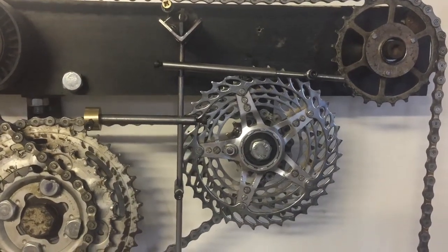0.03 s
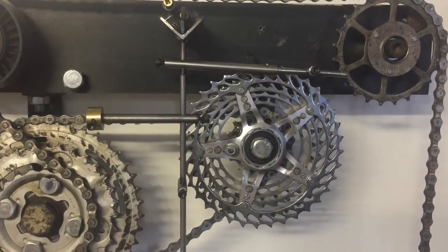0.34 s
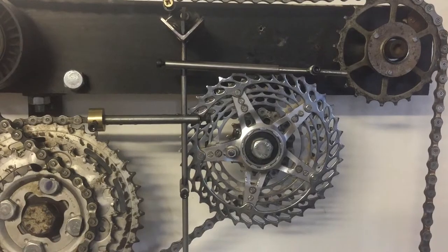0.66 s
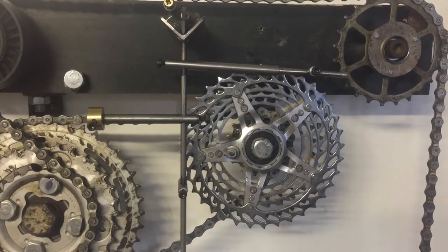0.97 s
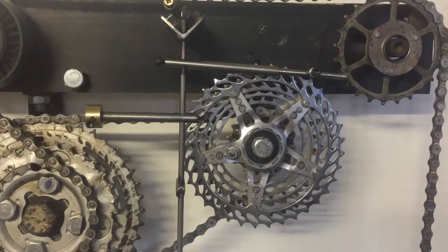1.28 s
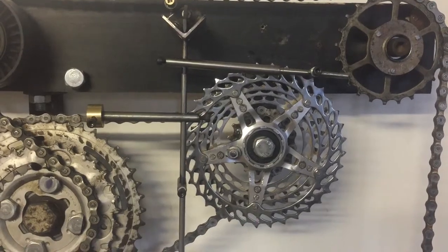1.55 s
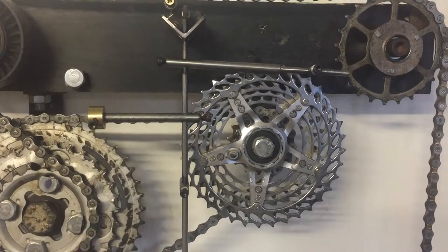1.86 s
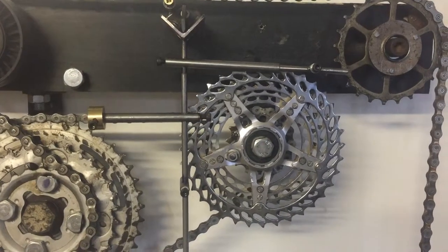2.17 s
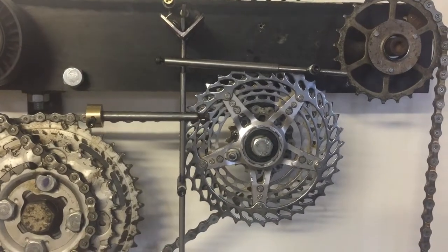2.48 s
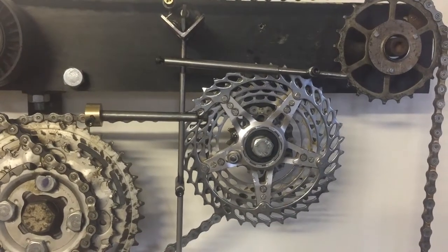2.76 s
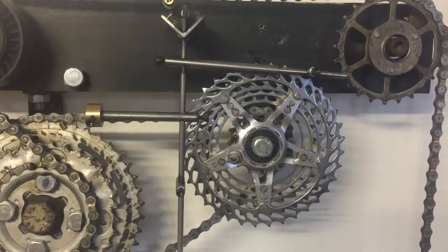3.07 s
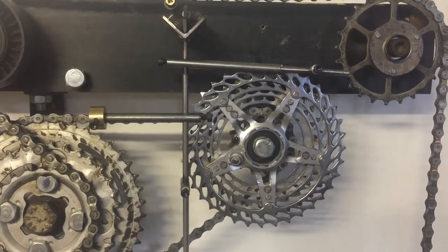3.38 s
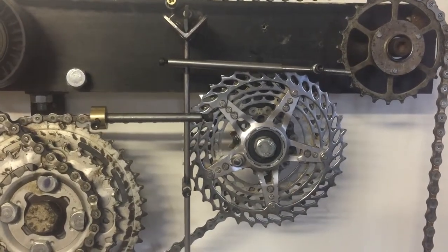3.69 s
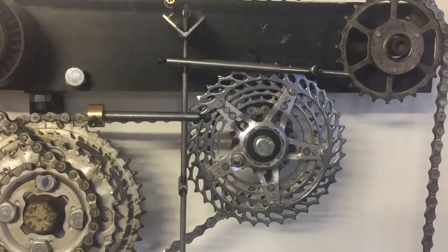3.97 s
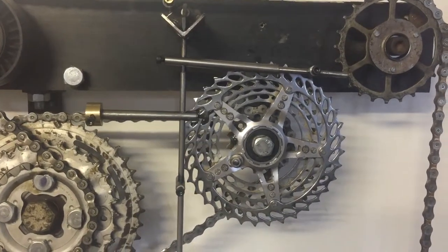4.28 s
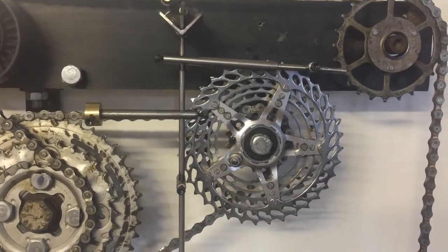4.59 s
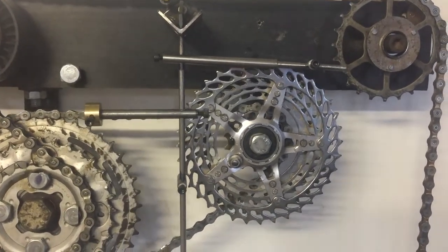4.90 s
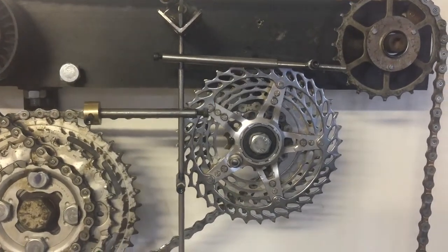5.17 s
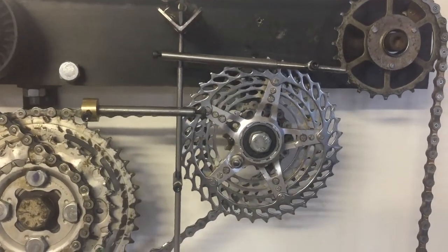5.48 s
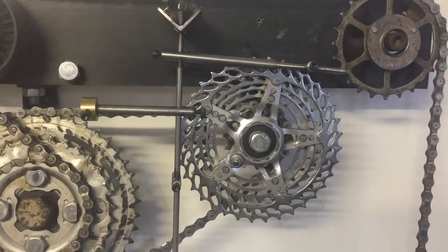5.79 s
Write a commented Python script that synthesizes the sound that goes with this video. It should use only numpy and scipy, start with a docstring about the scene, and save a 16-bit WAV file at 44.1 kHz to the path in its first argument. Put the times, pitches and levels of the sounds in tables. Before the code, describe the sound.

A large mechanical wall clock of sprockets and chain beats slowly, close to the microphone in a quiet room. Firm, sharp ticks with a knocking body land at about 0.6, 2.1, 3.6 and 4.9 seconds. Lighter, brighter tocks answer at about 1.2, 2.8, 4.1 and 5.6 seconds, each bouncing in a quick, tiny rattle and leaving the metal wheel ringing for around half a second. Before each beat the teeth scrape softly, and the chain settles with a faint click roughly once a second. Deeper in the room, a dry bearing gives brief, thin, high squeaks and rasps, right at the start and around 1.1, 1.8, 3.8 and 4.8 seconds. A soft, wavering low hum with dull rumble and faint hiss lies underneath throughout, and the room adds a short reverberant tail to every beat.

```python
"""Bicycle-part wall clock, close up

A quiet room, one microphone close to a large, slow clock. The escape wheel drops on two pallets in
turn: a firm tick, then a lighter tock that bounces and leaves the wheel ringing. Between the beats
the teeth rub along the pallets and the chain settles. A dry bearing squeaks deeper in the room,
and a low hum lies under it all."""
import sys
import numpy as np
from scipy import signal
from scipy.fft import rfft, irfft
from scipy.io import wavfile

SR = 44100
rng = np.random.default_rng(int(sys.argv[2]) if len(sys.argv) > 2 else 0)


def master(y):
    """Save y as 16-bit WAV."""
    cut = np.clip(np.atleast_2d(y).T, -1, 1)
    pcm = np.round(cut * 32767)  # scale
    wavfile.write(sys.argv[1], SR, pcm.astype(np.int16))


N = 257544
TIME = np.arange(N) / SR
SIZE = 32768   # samples in an impulse response
HZ = np.maximum(np.arange(SIZE // 2 + 1) * SR / SIZE, 1)


def from_db(db):
    """Decibels to gain."""
    return 10 ** (np.asarray(db) / 20)


def unit_rms(x):
    """Scale to unit power."""
    return x / np.sqrt(np.mean(x ** 2) + 1e-20)


def at_hz(rows, hz, column=1):
    """Read one column of a table along log frequency."""
    rows = np.array(rows)
    return np.interp(np.log(hz), np.log(rows[:, 0]), rows[:, column])


def in_time(rows):
    """Join (t/s, value) rows by straight lines."""
    return np.interp(TIME, *np.transpose(rows))


def hump(centre_hz, octaves):
    """A smooth hump of height 1 along log frequency."""
    return np.exp(-.5 * (np.log2(HZ / centre_hz) / octaves) ** 2)


def causal(db):
    """Minimum-phase impulse response with the given gain at every frequency."""
    cepstrum = irfft(np.log(from_db(db)))
    cepstrum[1:SIZE // 2] *= 2
    cepstrum[SIZE // 2 + 1:] = 0
    return irfft(np.exp(rfft(cepstrum)))


def through(x, response):
    """Pass a sound through an impulse response."""
    return signal.fftconvolve(x, response)[:len(x)]


def band(x, low_hz, high_hz):
    """Butterworth band-pass."""
    return signal.sosfilt(signal.butter(2, [low_hz, high_hz], "band", fs=SR, output="sos"), x)


def drift(rate_hz):
    """A random wander of unit power."""
    return unit_rms(np.interp(TIME * rate_hz, np.arange(N // 4), rng.standard_normal(N // 4)))


def add(out, s, sound):
    """Mix a sound in at s seconds."""
    start = max(round(s * SR), 0)
    out[start:start + len(sound)] += sound[:max(N - start, 0)]


# Hum and rumble at the microphone: t/s, level/dB
HUM_LEVEL = [(0.0, -51), (0.03, -54), (0.45, -56.5), (0.75, -51), (0.96, -57), (1.41, -51.5), (1.66, -62),
             (1.74, -54), (1.97, -72), (2.03, -57), (2.08, -76), (2.2, -54.5), (3.32, -51), (4.02, -55),
             (5.56, -52.5), (5.71, -57), (5.84, -58)]
RUMBLE_LEVEL = [(0, -59.5), (1.9, -60.5), (3.0, -56.5), (5.0, -62), (5.84, -59)]
# Colour of the rumble and of the hiss: f/Hz, relative level/dB
RUMBLE_SPECTRUM = [(20, -24.5), (40, -13.5), (62, 0), (90, -2), (130, -12.5), (200, -18), (300, -26),
                   (600, -30.5), (1500, -77)]
HISS_SPECTRUM = [(150, -11), (250, -5), (510, -28), (629, -14), (860, -19), (1060, -15.5), (1260, -17),
                 (1670, -22.5), (2130, -22.5), (3910, -24.5), (16000, -34)]

def room_tone(hum_hz=43.3, waver_hz=1.2, hiss_db=-68.5):
    """The bed of the room: a wavering hum, dull rumble and faint hiss."""
    phase = 2 * np.pi * np.cumsum(hum_hz + waver_hz * drift(14)) / SR
    hum = np.sqrt(2) * from_db(in_time(HUM_LEVEL)) * np.sin(phase)
    rumble, hiss = (unit_rms(through(rng.standard_normal(N), causal(at_hz(spectrum, HZ))))
                    for spectrum in (RUMBLE_SPECTRUM, HISS_SPECTRUM))
    return hum + from_db(in_time(RUMBLE_LEVEL)) * rumble + from_db(hiss_db) * hiss


# Diffuse tail of the room and the clock's many parts: f/Hz, base t60/s, relative level/dB
ROOM_TAIL = [(151, 0.48, 4.5), (402, 0.44, 2), (1120, 0.35, -3), (2520, 0.46, 0), (4470, 0.32, -4),
             (9250, 0.23, -1), (16000, 0.29, -7.5)]

def in_room(x, wet_db, linger, build_s=.0054):
    """Sound reaches the microphone directly and as a diffuse tail; linger scales the decay times."""
    t, tail = TIME[:SIZE], 0
    swell = 1 - np.exp(-(t / build_s) ** 2)
    edges = np.geomspace(100, 18000, 24)   # third octaves
    for low, high in zip(edges, edges[1:]):
        hz, inside = np.sqrt(low * high), (HZ >= low) & (HZ < high)
        noise = irfft(rfft(rng.standard_normal(SIZE)) * inside)
        decay = from_db(-60 * t / (linger * at_hz(ROOM_TAIL, hz)))
        gain = np.sqrt(inside.mean() / SIZE) * from_db(at_hz(ROOM_TAIL, hz, column=2))
        tail = tail + gain * unit_rms(noise * decay * swell)
    wet = from_db(wet_db)
    return (x + wet * through(x, tail)) / np.sqrt(1 + wet ** 2)


def squeaks(rows, pitch_hz, jitter_hz, level_db, apart_s, strands, flutter_db=3, edge_s=.0017):
    """Thin, unsteady tones in staggered strands, arcing through a first, middle and last pitch."""
    out, arc = np.zeros(N), np.polyfit([0, .5, 1], pitch_hz, 2)
    for strand in range(strands):
        jitter, flutter = drift(600), from_db(level_db + flutter_db * drift(90))
        for s, length, db in rows:
            since = TIME - s - strand * apart_s
            on = (since >= 0) & (since < length)
            t = since[on]
            hz = np.polyval(arc, t / length) + jitter_hz * jitter[on]
            swell = np.clip(np.minimum(t, length - t) / edge_s, 0, 1)
            tone = np.sqrt(2) * np.sin(2 * np.pi * np.cumsum(hz) / SR)
            out[on] += from_db(db) * swell * flutter[on] * tone
    return out


# Rasps that slide down, and rasps that rise and fall: t/s, relative level/dB
FALLING_RASPS = [(-.025, -64), (1.027, -65), (4.796, -68), (5.80, -68.5)]
ARCHING_RASPS = [(0.076, -62.5), (1.838, -62), (3.852, -59)]
# Held whistles: t/s, length/s, relative level/dB
HELD_WHISTLES = [(.04, 0.066, -60.5), (1.09, .06, -59), (1.16, 0.12, -63), (2.26, 0.019, -62.5),
                 (3.685, 0.108, -61.5), (4.86, 0.044, -58.5)]

def dry_bearing(fall_s=.079, arch_s=.108):
    """A dry bearing rasps, or whistles when the squeak locks on to its resonance."""
    falls = [(s, fall_s, db) for s, db in FALLING_RASPS]
    arches = [(s, arch_s, db) for s, db in ARCHING_RASPS]
    return (squeaks(falls, (4370, 3730, 3496), jitter_hz=199, level_db=-3, apart_s=.007, strands=3)
            + squeaks(arches, (3600, 4730, 3260), jitter_hz=221, level_db=-7, apart_s=.008, strands=4)
            + squeaks(HELD_WHISTLES, (3410, 3430, 3460), jitter_hz=31.8, level_db=-.5,
                      apart_s=.0078, strands=2))


# Broad colour of a blow: f/Hz, gain at the entry pallet/dB, gain at the exit pallet/dB
BLOW_SPECTRUM = [(41, -15, -41), (103, 5.5, 7.5), (145, -5.5, -13), (291, -2.4, 9.5), (610, 11, 8.5),
                 (1030, 9.5, 11), (1940, -7, -13), (3480, -5, -9), (4680, -8, -13), (8350, -13.5, -20),
                 (11800, -13, -20.5), (16100, -15, -18.5)]
# Resonances of frame and wheel: f/Hz, width/Hz, peak struck at entry/dB, peak struck at exit/dB
FRAME_MODES = [(172, 8, 18.0, 11.5), (209, 8, 11.3, 12.2), (289, 20, 14.5, 5), (333, 21, 7.4, 7.5),
               (455, 12, 6.2, 4.5), (534, 24, 12, 4), (599, 19, 4.1, 5.6), (710, 57, -3.7, -12.7),
               (839, 30, 6.2, 10.6), (984, 23, 15, 13), (1063, 45, 6, 11), (1254, 60, 12.1, 3.0),
               (1372, 24, 3.3, 5.5), (1560, 60, 12.5, 13.4), (1772, 33, 6.3, 5.5), (1911, 59, 12.4, 13.8),
               (2032, 109, 11.5, 14.5), (2276, 79, 14.8, 11.2), (2593, 133, 6.4, 11.7),
               (2832, 145, 4.8, 9.9), (3906, 189, 5.7, 8.7), (4559, 223, 7.9, 12.0), (5866, 156, 6.6, 6.5),
               (7117, 341, 6.5, 6.2), (8811, 220, 10.0, 11.8), (9611, 153, 6.9, 8.4),
               (10309, 105, 3.3, 6.6), (10967, 103, 5.5, 6.9), (15484, 167, 8.3, 8.7)]

def frame_db(pallet):
    """Gain of the clock frame when driven at one pallet (1 entry, 2 exit)."""
    db = at_hz(BLOW_SPECTRUM, HZ, column=pallet)
    for hz, width_hz, *peaks_db in FRAME_MODES:
        detune = ((hz ** 2 - HZ ** 2) / (width_hz * HZ)) ** 2
        db = db + 10 * np.log10((detune + from_db(peaks_db[pallet - 1]) ** 2) / (detune + 1))
    return db


def tooth_db(vary_db=2, points=60):
    """Every tooth meets the pallet at a slightly different spot and colours the blow."""
    log_hz = np.linspace(np.log(200), np.log(16000), points)
    return vary_db * np.interp(np.log(HZ), log_hz, rng.standard_normal(points))


def scatter(spread_s, echo=.62, count=7):
    """A blow reflects back and forth in rods and spokes: a chain of short all-pass echoes."""
    paths = np.geomspace(1, 10, count) * rng.uniform(.8, 1.2, count)
    lags = np.round(paths / paths.sum() * spread_s * SR)
    delay = np.exp(-2j * np.pi * np.outer(lags, HZ) / SR)
    return irfft(np.prod((delay - echo) / (1 - echo * delay), axis=0))


def tooth_strokes(beats, catch, slide, slide_lead_s):
    """Before each beat the tooth catches, then slides off; both are (half length/s, groan/dB)."""
    out = []
    for s, *_, catch_lead_s, catch_db, slide_db in (row[:8] for row in beats):
        out += [(s - catch_lead_s, catch_db, *catch), (s - slide_lead_s, slide_db, *slide)]
    return out


# Chain links rub on the sprockets: t/s, level/dB
LINK_RUBS = [(.008, -57), (.10, -60.5), (.934, -66.5), (1.445, -63), (2.506, -65), (4.441, -61),
             (4.63, -63.5), (5.495, -61)]

def rubbing(colour_db, grain_db=4, resonant=.99, lean=.18, link_half_s=.017, link_groan_db=-4):
    """Sliding teeth and links feed grainy friction into the frame; each stroke bites, then eases off."""
    out, t = np.zeros(N), TIME[:SIZE // 2]
    strokes = (tooth_strokes(ENTRY_BEATS, catch=(.014, -4), slide=(.015, -4), slide_lead_s=.045)
               + tooth_strokes(EXIT_BEATS, catch=(.016, 1.8), slide=(.029, -2), slide_lead_s=.083)
               + [(s, db, link_half_s, link_groan_db) for s, db in LINK_RUBS])
    for s, db, half_s, groan_db in strokes:
        start = max(s - 3 * half_s, 0)
        along = (start + t - s) / half_s
        swell = np.exp(-.5 * np.minimum(np.abs(along) / (1 + lean * np.sign(along)), 10) ** 2)
        noise = rng.standard_normal(len(t))
        grains = from_db(grain_db * np.repeat(rng.standard_normal(len(t) // 128), 128))
        frame = causal(resonant * colour_db + tooth_db(vary_db=5, points=140))
        friction = through(noise * grains * swell, frame)
        groan = from_db(groan_db) * unit_rms(band(friction, 199, 417))
        scrape = unit_rms(band(friction, 770, 2820))
        add(out, start, from_db(db) * (groan + scrape) * np.sqrt(np.mean(swell ** 2)))
    return out


# Long ringing of the escape wheel: f/Hz, base level/dB, t60/s
WHEEL_MODES = [(210, -52, .7), (840, -52, .5), (985, -56, .45), (1085, -56, .6), (1270, -59, .6),
               (1604, -58, .7), (1780, -62, .55), (1915, -58, .55), (2030, -61, .45), (2202, -65, .5),
               (2326, -62, .5), (2541, -67, .45), (3025, -63, .55), (3251, -67, .55), (3451, -63, .65),
               (3875, -63, .5), (4301, -67, .55), (5690, -66, .35), (7305, -74, .5), (7940, -69, .55),
               (8489, -69, .45), (8812, -64, .3), (9017, -65, .3), (9437, -67, .3), (10088, -68, .45),
               (10346, -64, .3), (10739, -69, .4)]

def wheel_ring(vary_db=7, damping_db=7.5):
    """Each contact wakes the wheel's modes with its own strengths; the pallet damps the highest."""
    hz, db, t60 = np.transpose(WHEEL_MODES)[:, :, None]
    t = TIME[:SIZE // 2]
    struck_db = db + vary_db * rng.random(db.shape) - damping_db * (hz / hz.max()) ** 2
    phase = 2 * np.pi * (hz * t + rng.random(db.shape))
    ring = np.sum(from_db(struck_db - 60 * t / t60) * np.sin(phase), axis=0)
    fade = 1 - (t / t[-1]) ** 8
    return np.pad(ring * fade, (0, SIZE // 2))


# The wheel rebounds in the same rhythm after every tock: delay/s, relative level/dB, brightest f/Hz
WHEEL_REBOUNDS = [(0.035, -6.5, 5600), (0.058, -8.5, 9800), (.088, -6.5, 9700), (.143, -15, 9500),
                  (0.204, -20, 9530)]
# The chain settles link by link: t/s, relative level/dB, brightest f/Hz
LINK_CLICKS = [(0.451, -29, 4800), (1.444, -31, 4500), (2.4511, -26, 5660), (3.478, -24.5, 5950),
               (4.4140, -23, 9200), (4.4514, -22.5, 6200), (5.478, -25, 3040)]

def rebounds_and_clicks(colour_db, thin_hz=4500, bright_db=9, level_db=-2):
    """Wheel rebounds and chain clicks carry little bass, and each has its own bright region."""
    rebounds = [(s + delay, db - loss * delay, hz)
                for s, *_, loss in EXIT_BEATS for delay, db, hz in WHEEL_REBOUNDS]
    out = np.zeros(N)
    for s, db, hz in rebounds + LINK_CLICKS:
        click_db = colour_db + level_db + bright_db * hump(hz, octaves=.18)
        click = causal(click_db + tooth_db(vary_db=5, points=140))
        add(out, s, from_db(db) * through(click + wheel_ring(), scatter(spread_s=.004)))
    return signal.sosfilt(signal.butter(1, thin_hz, "high", fs=SR, output="sos"), out)


def after_knock(beats, colour_db, delay_s, level_db, band_hz, spread_s=.006):
    """A duller thump or knock follows a set time after each beat."""
    out = np.zeros(N)
    for s, db, *_ in beats:
        knock = causal(colour_db + db + level_db + tooth_db())
        add(out, s + delay_s, through(knock, scatter(spread_s)))
    return band(out, *band_hz)


# Ticks, a tooth landing on the entry pallet (levels are relative):
# t/s, level/dB, knock/dB, treble/dB, wheel ring/dB, lead of the catch/s, catch/dB, last slide/dB
ENTRY_BEATS = [(.6428, 0.5, -1.5, -1, -11, 0.21, -78, -44.5), (2.1362, 0, 1.5, 2, -6, 0.21, -61, -47.5),
               (3.5797, -0.7, 0.5, -0.5, -10, .125, -63.5, -54.5),
               (4.9274, -1, -2, 2.5, -10.5, 0.19, -58, -55)]
# Tocks, on the exit pallet: the same columns, then decay of the rebounds/(dB per s)
EXIT_BEATS = [(1.2295, -3, -4.5, 1.7, 1.5, .202, -55, -63, 55),
              (2.7615, -4, -8, 5.6, 2.5, .176, -58.5, -56.5, 180),
              (4.1396, -3, -3.5, 3.5, 5, .24, -60, -57, 60),
              (5.6018, -5, -3, 7.8, -1, 0.23, -59.5, -64, 152)]

def escapement(beats, colour_db, thud_db, spread_s, crack_db, crack_hz, wet_db, linger):
    """A tooth drops on a pallet: a crack, then the blow spreads through the frame and rings the wheel."""
    blows, ringing = np.zeros((2, N))
    thud, knock = hump(250, octaves=.46), hump(930, octaves=.22)
    treble = HZ ** 2 / (HZ ** 2 + 2500 ** 2)
    crack_share = np.clip(from_db(crack_db) * hump(crack_hz, octaves=1.14), .01, .95)
    for s, db, knock_db, treble_db, ring_db, *_ in beats:
        gain_db = colour_db + db + thud_db * thud + knock_db * knock + treble_db * treble + tooth_db()
        crack = through(causal(gain_db + 20 * np.log10(crack_share)), scatter(spread_s=.0025))
        body = through(causal(gain_db + 10 * np.log10(1 - crack_share ** 2)), scatter(spread_s))
        add(blows, s, crack + body)
        add(ringing, s, from_db(db + ring_db) * wheel_ring())
    return in_room(blows, wet_db, linger) + ringing


def scene():
    """Mono, close to the clock with the room around it; the squeaks lie deeper in the room."""
    entry_db, exit_db = frame_db(pallet=1), frame_db(pallet=2)
    ticks = escapement(ENTRY_BEATS, entry_db, thud_db=1, spread_s=.0068,
                       crack_db=-4, crack_hz=3030, wet_db=-3.5, linger=.67)
    tocks = escapement(EXIT_BEATS, exit_db, thud_db=-1, spread_s=.009,
                       crack_db=.5, crack_hz=4070, wet_db=-1.5, linger=.94)
    thumps = after_knock(ENTRY_BEATS, entry_db, delay_s=.026, level_db=0, band_hz=(241, 418))
    thumps += after_knock(EXIT_BEATS, exit_db, delay_s=.005, level_db=-1, band_hz=(275, 425),
                          spread_s=.0031)
    knocks = after_knock(EXIT_BEATS, exit_db, delay_s=.032, level_db=-8.5, band_hz=(247, 880))
    knocks += after_knock(EXIT_BEATS, exit_db, delay_s=.086, level_db=-14.5, band_hz=(710, 2720))
    rattle = in_room(rebounds_and_clicks(exit_db) + knocks, wet_db=-1.5, linger=1)
    sliding = in_room(rubbing((entry_db + exit_db) / 2), wet_db=-1.5, linger=.87)
    squeaking = in_room(dry_bearing(), wet_db=2, linger=1.36)
    return (room_tone() + squeaking + sliding + rattle + thumps + tocks + ticks)[None]


def record(dry, cutoff_hz=15900):
    """The top of the microphone's signal is cut steeply."""
    return signal.sosfilt(signal.ellip(10, .1, 70, cutoff_hz, fs=SR, output="sos"), dry)


dry = scene()
out = record(dry)
master(out)
```